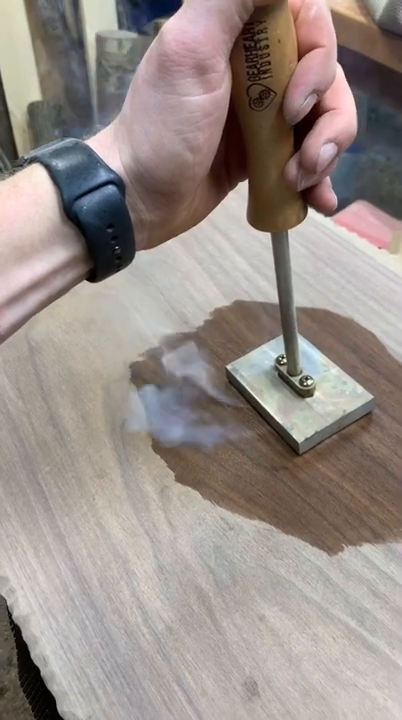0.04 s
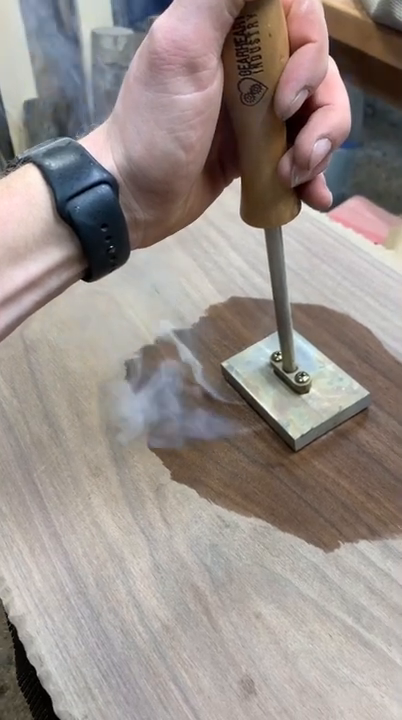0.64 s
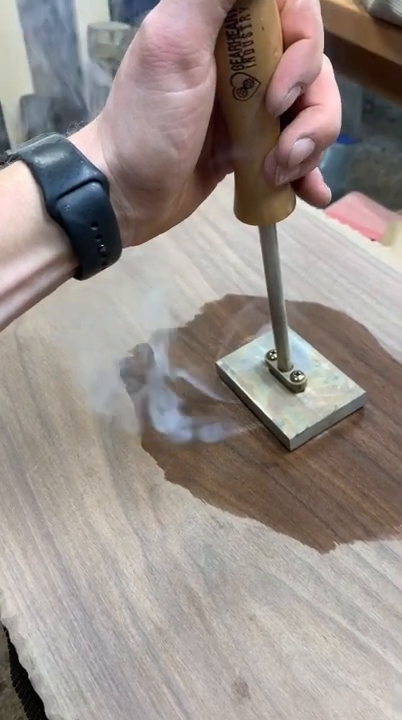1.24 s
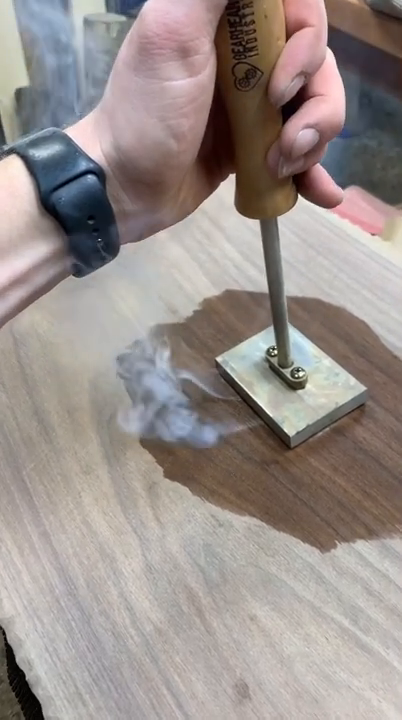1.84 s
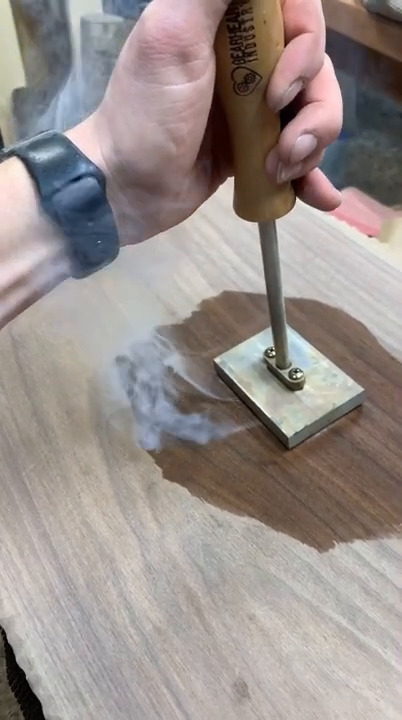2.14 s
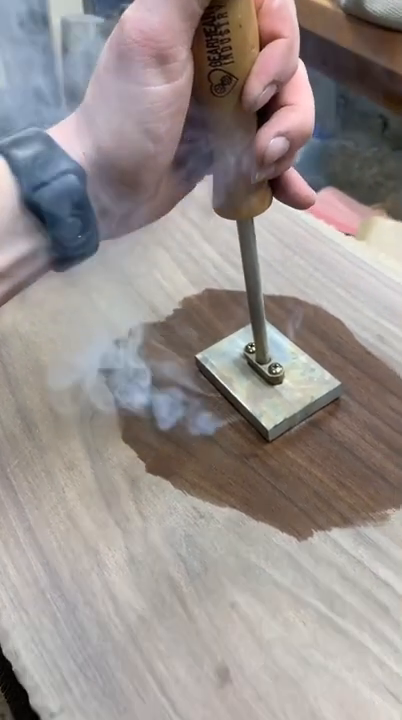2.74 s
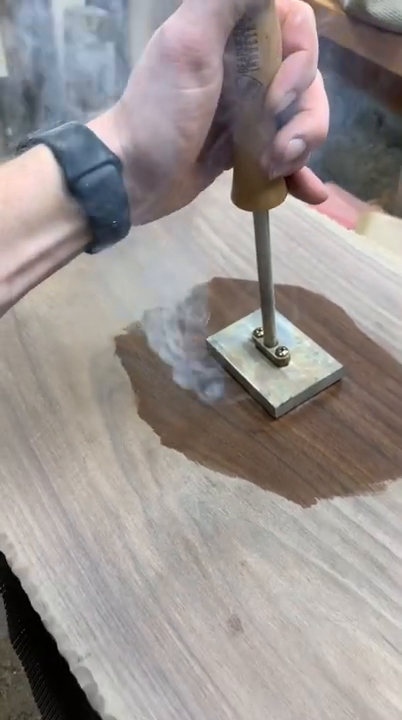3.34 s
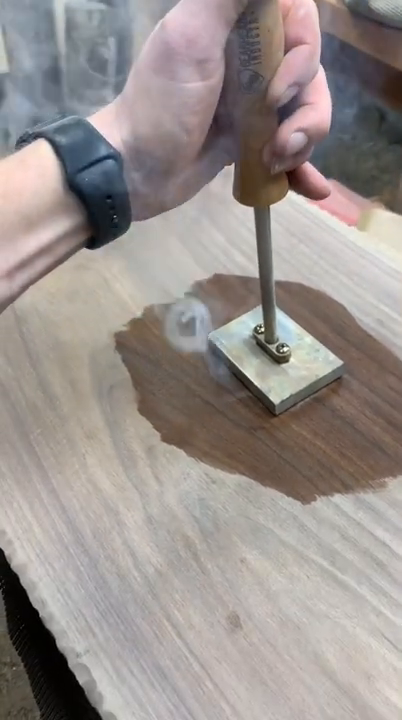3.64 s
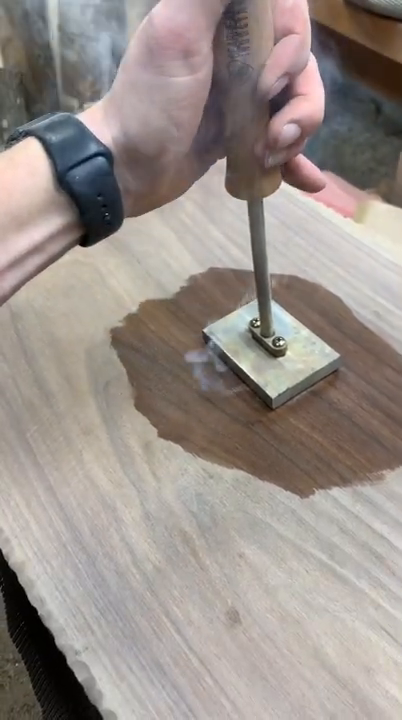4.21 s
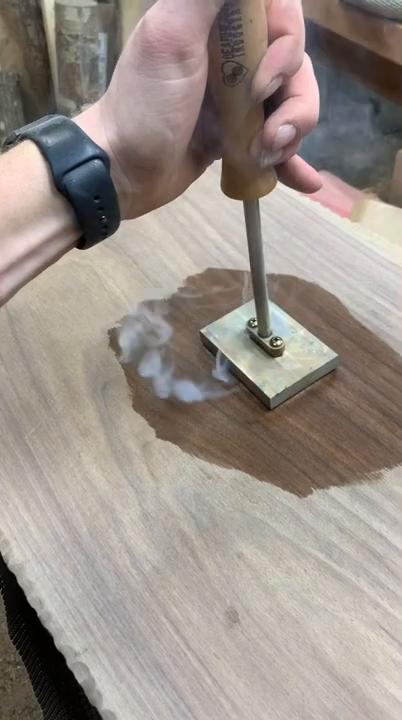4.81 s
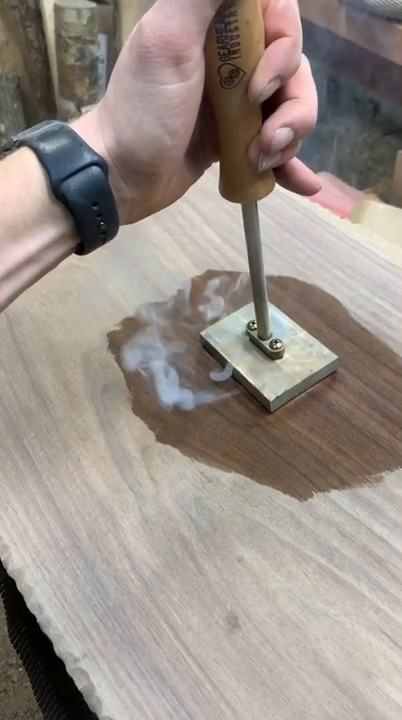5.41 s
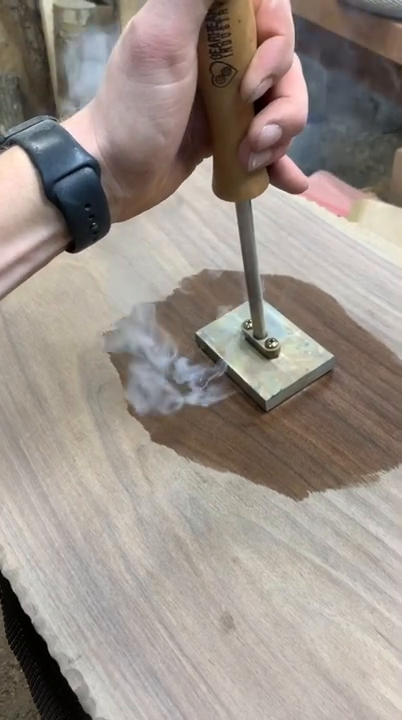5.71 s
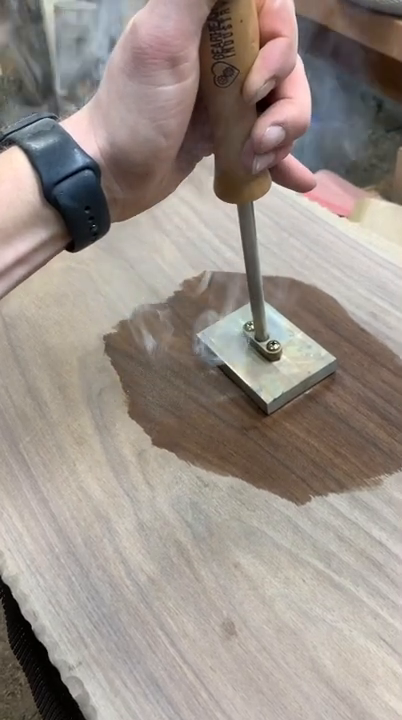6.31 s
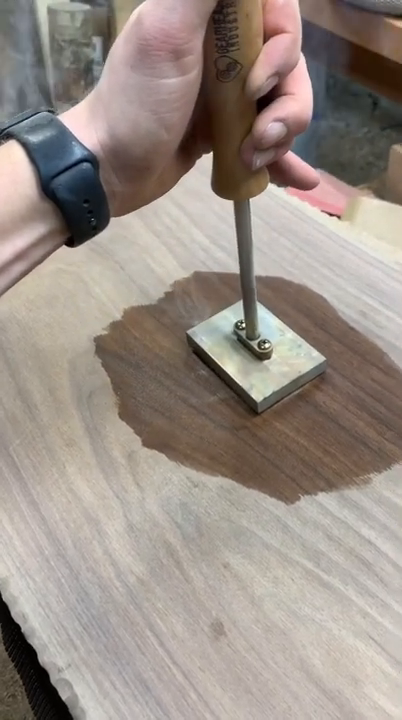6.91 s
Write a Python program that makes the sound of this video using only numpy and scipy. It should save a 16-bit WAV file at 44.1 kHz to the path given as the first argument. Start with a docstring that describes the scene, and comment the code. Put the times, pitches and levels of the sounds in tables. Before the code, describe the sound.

Steam sizzles from under a hot iron pressed on a wet board, fades, then returns after light metal clicks, a workshop fan droning behind.

```python
"""Steam hisses from under a hot branding iron pressed on a damp wooden board in a workshop.
Water boils in long surges: turbulent steam and bursting bubbles excite the resonances of the gap,
which shift as the iron settles and again when it is rocked. Drops spit and the wood simmers.
Slips of the iron set the metal ticking, and the board knocks under the shifting weight.
A fan and a mains hum drone behind, dipping once for an instant."""
import sys
import numpy as np
from scipy import signal
from scipy.fft import rfft, irfft
from scipy.io import wavfile
from scipy.ndimage import uniform_filter1d, map_coordinates

SR = 44100
rng = np.random.default_rng(int(sys.argv[2]) if len(sys.argv) > 2 else 0)


def unload_audio(sound):
    """Save the sound as a 16-bit wav file, at the path given as the first command line argument."""
    columns = np.transpose(np.atleast_2d(sound))
    # keep every value between -1 and 1, then stretch to whole-number steps
    steps = np.round(np.clip(columns, -1, 1) * 32767)
    wavfile.write(sys.argv[1], SR, steps.astype(np.int16))


N = 306936
TIME = np.arange(N) / SR
FREQ = np.maximum(np.arange(N // 2 + 1) * SR / N, 1)

# left-right coherence of room sound and of sound near the iron: (frequency [Hz], coherence [0-1])
ROOM_COHERENCE = [(30, 0.77), (280, 0.97), (650, 0.69), (1100, 0), (1500, 0.2), (2000, 0.68), (2600, 0.93),
                  (4000, 0.21), (6800, 1), (11000, 0.98), (15000, 1)]
NEAR_COHERENCE = [(3000, 0.8), (6000, 0.97), (7000, 1), (8300, 0.41), (9600, 1), (11000, 0.97),
                  (12400, 0.9), (13700, 0.99), (15000, 0.99)]
# resonances of the steam gap under the rocked iron: (frequency [Hz], width [Hz], gain [dB])
ROCKED_GAP = [(4460, 600, -21.5), (6190, 610, -14), (6930, 470, -13), (7350, 390, -11), (8340, 630, -8),
              (8700, 830, -18), (10900, 250, 6.5), (10830, 720, 0), (11840, 900, -4), (13000, 570, -3),
              (14350, 330, -1), (15500, 330, -10)]


def undb(db):
    """Decibels to amplitude ratio."""
    return 10 ** (np.asarray(db) / 20)


def across(rows):
    """Interpolation of (frequency [Hz], value) rows on a logarithmic frequency axis."""
    hz, value = np.transpose(rows)
    return np.interp(np.log(FREQ), np.log(hz), value)


def resonances(rows):
    """Incoherent summation: the gain of steep resonances whose powers add."""
    powers = (undb(db) ** 2 / (1 + 2 * ((FREQ - hz) / width) ** 2) ** 2 for hz, width, db in rows)
    return np.sqrt(sum(powers))


def colour(x, gain):
    """Linear filtering: each frequency is multiplied by its gain."""
    return irfft(rfft(x) * gain, N)


def unit(pair):
    """Normalisation of a stereo pair so that the mean of its sides has rms 1."""
    return pair / np.std(pair.mean(axis=0))


def walk(rate):
    """Random modulation of unit spread: levels held for 1 / rate seconds and smoothed twice."""
    hold = max(int(SR / rate), 2)
    steps = np.repeat(rng.standard_normal(N // hold + 1), hold)
    smooth = uniform_filter1d(uniform_filter1d(steps, hold), hold)[:N]
    return smooth / smooth.std()


def place(events):
    """Superposition of (time [s], sound) events."""
    out = np.zeros(N)
    for s, sound in events:
        start = int(s * SR)
        out[start:start + len(sound)] += sound[:N - start]
    return out


def stereo(common, apart, coherence, phase=None):
    """Partial coherence: one signal is shared, one has opposite signs, and the sides differ in phase."""
    # usual phase between the sides: (frequency [Hz], lead of the left [rad])
    usual_phase = [(20, 0), (620, 0), (860, -1.3), (1640, .6), (2400, 3.0), (5400, 3.25), (6200, 6.25),
                   (7490, 6.3), (9080, 9.35), (10200, 9.5), (11800, 12.55), (13000, 12.6), (14500, 15.7)]
    lead = across(usual_phase if phase is None else phase)
    alike = np.clip(across(coherence), 0, 1)
    sign = np.array([[1], [-1]])
    pair = rfft(common) * np.sqrt((1 + alike) / 2) + sign * rfft(apart) * np.sqrt((1 - alike) / 2)
    return irfft(pair * np.exp(.5j * sign * lead), N)


def scatter(x, t60):
    """Diffuse reflection: convolution with an exponentially fading noise tail of unit energy."""
    t = TIME[:SR // 4]
    tail = rng.standard_normal(len(t)) * undb(-60 * t / t60)
    return signal.fftconvolve(x, tail / np.linalg.norm(tail))[:N]


def ring(modes, tilt_db_per_octave=0, stretch=1, vary_db=1.5):
    """Free vibration: a sum of damped modes, weighted a little differently by each point of contact."""
    t = TIME[:SR // 4]
    top_db = max(db + tilt_db_per_octave * np.log2(hz) for hz, db, _ in modes)
    out = 0
    for hz, db, t60 in modes:
        start_db = db + vary_db * rng.uniform(-1, 1) + tilt_db_per_octave * np.log2(hz) - top_db
        out += undb(start_db - 60 * t / (t60 * stretch)) * np.sin(2 * np.pi * (hz * t + rng.random()))
    return out


def dip(at_s=2.727, depth_db=-17, fall_s=0.011, recover_s=0.018):
    """Amplitude envelope of the drone: the level dips briefly and recovers."""
    after = TIME - at_s
    return undb(depth_db * np.exp(-np.maximum(-after / fall_s, after / recover_s)))


def fan(air_db=-51, housing_db=-52):
    """Broadband and tonal fan noise: turbulent air, a resonant housing, mains hum and motor whine."""
    # spectrum of the rushing air: (frequency [Hz], relative spectral density [dB])
    air_spectrum = [(25, -18.5), (45, -7), (72, 3), (100, -2.5), (155, -7.5), (260, -2), (370, -13.5),
                    (600, -12), (760, -16.5), (1200, -23), (2200, -27), (3400, -37.5), (7500, -45.5),
                    (15000, -45)]
    # resonances of the housing: (frequency [Hz], width [Hz], gain [dB])
    housing_modes = [(121.5, 6, -7), (194.7, 16, -7), (237, 18.2, 0.5), (255.2, 10.8, -0.5),
                     (272.8, 16, -0.5), (318.8, 21, -7.5), (416, 27.3, -9), (468.3, 24, -9), (548, 17, -11),
                     (637.7, 24, -8), (1226, 26.6, -17), (1418, 9.4, -17.5)]
    # mains hum and motor whine: (frequency [Hz], level [dB], wobble [dB])
    motor_tones = [(120, -55.8, 2.2), (835.6, -59.8, .5)]
    air, housing = (stereo(*rng.standard_normal((2, N)), ROOM_COHERENCE) for _ in range(2))
    air = undb(air_db + 0.5 * walk(6.6)) * unit(colour(air, undb(across(air_spectrum))))
    housing = undb(housing_db) * unit(colour(housing, resonances(housing_modes)))
    hum = 0
    for hz, db, wobble_db in motor_tones:
        amplitude = np.sqrt(2) * undb(db + wobble_db * walk(8.5))
        hum += amplitude * np.sin(2 * np.pi * hz * TIME + 0.16 * walk(3.2))
    return (air + housing + stereo(hum, np.zeros(N), ROOM_COHERENCE)) * dip()


def board_knocks():
    """Impulse response: the shifting weight jolts the board's modes, and bench reflections smear them."""
    # jolts of the board: (time [s], level [dB])
    jolts = [(4.221, -50), (4.239, -42.5), (4.278, -49), (4.344, -48), (4.401, -51)]
    # modes of the board: (frequency [Hz], relative level [dB], t60 [s])
    board_modes = [(468, -11, 0.046), (595, -3, 0.051), (630, -5, 0.073), (700, -7, 0.028),
                   (1490, -12, 0.035), (2090, -11, 0.05)]
    knocks = place((s, undb(db) * ring(board_modes)) for s, db in jolts)
    return stereo(scatter(knocks, t60=0.12), np.zeros(N), ROOM_COHERENCE)


def iron_ticks(linger_db=-27, room_db=-20):
    """Stick-slip excitation: each slip snaps, cracks, rasps the wood fibres and rings the metal."""
    # slips of the iron: (time [s], level [dB], brightness [dB/octave], relative grit [dB])
    slips = [(0.0973, -53, -6, 0), (0.631, -57, -5, 5), (0.7999, -53.5, -7.5, -2), (1.03, -55, -6, 4),
             (2.7322, -64, -5, 0), (4.1428, -33, -1.5, 0), (4.1946, -33.5, -2, 0), (4.2390, -35.5, 0, 1.5),
             (4.2607, -40.5, -2.5, 0), (4.3440, -43, -1, 1), (4.8815, -36, -1.5, 3)]
    # modes of the plate and its stem: (frequency [Hz], relative level [dB], t60 [s])
    iron_modes = [(1480, -18, .018), (2126, -18, .02), (2990, -9, .026), (3420, -15, .012),
                  (4010, -10, .024), (4310, -7, .016), (5990, -9, .011), (6621, 0, .022), (7100, -7, .009),
                  (8274, -7, .014), (8950, -7.5, .028), (9600, -5, .008), (10220, 0, .012),
                  (11900, -11, .011), (13700, -18, .016)]
    # phase of the ringing plate between the sides: (frequency [Hz], lead of the left [rad])
    iron_phase = [(1800, 0), (2400, 2.8), (2750, 0), (3100, 0), (3600, 1.8), (4400, 2), (5000, 3.2),
                  (6100, 5.7), (6700, 5.6), (7200, 6.5), (9000, 8.6), (10200, 9.8), (11700, 12),
                  (13000, 13), (14700, 15.7)]
    t = TIME[:SR // 4]

    def burst(band_hz, db, t60, lag_s=0):
        """Band-limited noise with exponential decay."""
        band = signal.butter(3, band_hz, "band", fs=SR, output="sos")
        envelope = (t >= lag_s) * undb(db - 60 * (t - lag_s) / t60)
        return signal.sosfilt(band, rng.standard_normal(len(t)) * envelope)

    def tick(brightness, grit_db):
        """Modal ringing plus contact noise; a duller slip also has a weaker snap and crack."""
        metal = ring(iron_modes, brightness) + undb(linger_db) * ring(iron_modes, brightness, stretch=4)
        snap = burst((1200, 15500), db=-1, t60=.004)
        crack = burst((5500, 10500), db=1, t60=.012)
        rasp = burst((1800, 5600), db=0, t60=.021, lag_s=.001)
        return metal + undb(grit_db) * (undb(brightness) * (snap + crack) + rasp)

    direct = place((s, undb(db) * tick(brightness, grit_db)) for s, db, brightness, grit_db in slips)
    in_room = direct + undb(room_db) * scatter(direct, t60=.2)
    return stereo(in_room, scatter(direct, t60=.005), NEAR_COHERENCE, iron_phase)


def spitting_drops(t60=0.0055, gap_db=-2, snap_hz=5500):
    """Flash evaporation: single drops excite the gap, and part of their high snap radiates directly."""
    # drops at the edge of the plate: (time [s], level [dB], relative level of the direct snap [dB])
    drops = [(1.8605, -32, -22), (1.8995, -34, -22), (2.0688, -31, -22), (5.5385, -30, -20),
             (5.5820, -35, -11), (5.5885, -36, -7), (5.6020, -44, -18)]
    t = TIME[:SR // 50]
    flashes = [(s, rng.standard_normal(len(t)) * undb(db - 60 * t / t60), snap_db)
               for s, db, snap_db in drops]
    spits = place((s, flash) for s, flash, _ in flashes)
    snaps = place((s, undb(snap_db) * flash) for s, flash, snap_db in flashes)
    in_gap = colour(stereo(spits, scatter(spits, t60=.005), NEAR_COHERENCE), resonances(ROCKED_GAP))
    highpass = signal.butter(4, snap_hz, "high", fs=SR, output="sos")
    return undb(gap_db) * in_gap + signal.sosfilt(highpass, snaps)


def steam_flow(build_power=0.97, die_power=1.6):
    """Power addition of boiling surges: gives their joint flow (a gain) and the share due to bubbles."""
    # surges: (start [s], build-up [s], hold [s], die-away [s], level [dB], bubble share [0-1])
    surges = [(-.4, 0.26, 0.95, 0.76, -40.5, 0.1), (0.978, 0.62, 0.65, 0.41, -41, 0.33),
              (2.487, 0.32, 0.1, 0.21, -63, 0.8), (4.188, 0.47, 0.26, 0.88, -48, 0.8),
              (4.7, 0.404, 0.438, 0.075, -41, 0.24), (5.168, 0.11, 0.035, 0.062, -43.5, 0.3),
              (6.738, 0.057, 0.053, 0.089, -64, 0.5)]
    power, bubble_power = 1e-18, 0
    for start, build, hold, die, db, share in surges:
        rise = np.clip((TIME - start) / build, 0, 1) ** build_power
        fall = np.clip(1 - (TIME - start - build - hold) / die, 0, 1) ** die_power
        surge = (undb(db) * rise * fall) ** 2
        power += surge
        bubble_power += share * surge
    return np.sqrt(power), np.clip(bubble_power / power, 0, 1)


def simmer(flow, rest_db=-79, hot_db=-72, cool_s=0.36, dry_from_s=6.47, drying_s=0.22):
    """Thermal lag: damp wood stores the heat of the surges and seethes between them until it is dry."""
    retained = np.exp(-1 / (cool_s * SR))
    heat = signal.lfilter([1 - retained], [1, -retained], flow / flow.max())
    moisture = np.clip(1 - (TIME - dry_from_s) / drying_s, 0, 1)
    noise = stereo(*rng.standard_normal((2, N)), NEAR_COHERENCE)
    seething = unit(colour(noise, resonances([(7000, 2200, 0)])))
    return seething * moisture * np.hypot(undb(rest_db), undb(hot_db) * heat) * undb(1.3 * walk(12))


def bubble_bursts(per_s, spread_db):
    """Shot noise of rms 1: bubbles burst at random moments, most small and a few large."""
    sizes = undb(spread_db * np.minimum(rng.exponential(size=N), 4))
    impulses = (rng.random(N) < per_s / SR) * sizes * rng.choice([-1, 1], N)
    return impulses / impulses.std()


def rim_crackle(flow, per_s=140, spread_db=3, full_flow_db=-72):
    """Bubble resonance: bigger bubbles at the rim crackle below the hiss, in proportion to the flow."""
    # pitches of the rim bubbles: (frequency [Hz], width [Hz], gain [dB])
    rim_bands = [(3150, 300, -6), (3900, 450, -3), (4600, 500, 0), (5250, 400, 2)]
    bubbles = stereo(bubble_bursts(per_s, spread_db), bubble_bursts(per_s, spread_db), NEAR_COHERENCE)
    return unit(colour(bubbles, resonances(rim_bands))) * flow / flow.max() * undb(full_flow_db)


def blowing(flow, full_flow_db=-69.5, flow_power=0.51, gurgle_db=1.2):
    """Jet noise: steam leaves the edge in soft, uneven spurts that grow as a power of the flow."""
    # broad peaks of the jet: (frequency [Hz], width [Hz], gain [dB])
    jet_bands = [(1340, 940, 5), (3650, 1800, -9)]
    noise = stereo(*rng.standard_normal((2, N)), ROOM_COHERENCE)
    jet = unit(colour(noise, resonances(jet_bands)))
    return jet * (flow / flow.max()) ** flow_power * undb(full_flow_db + gurgle_db * walk(16))


def boiling(bubble_share, pops_per_s=40, pop_db=10, pop_spread_db=2.5):
    """Broadband excitation: turbulent steam and bubbles share the power, with sharper pops on top."""
    popping = rng.random(N) < pops_per_s / SR
    pops = popping * undb(pop_db + pop_spread_db * np.minimum(rng.exponential(size=N), 2.5))
    bubbles = np.sqrt(bubble_share) * bubble_bursts(per_s=2100, spread_db=2.0)
    steam = np.sqrt(1 - bubble_share) * rng.standard_normal(N)
    return bubbles + steam + pops


def steam_hiss(flow, bubble_share, settle_s=0.96, settling_s=0.63, rocked_s=4.2,
               pitch_drift=.004, treble_hz=9060, treble_power=0.33, sputter_db=0.6, bench_db=-24):
    """Cavity resonance: the gap filters the boiling, and its peaks shift as the iron settles or rocks."""
    # resonances of the gap at first and once settled: (frequency [Hz], width [Hz], gain [dB])
    first_gap = [(5160, 1500, -17), (5800, 310, -13), (7080, 610, -7), (8080, 380, -10), (8730, 470, -6.5),
                 (10550, 510, 2.5), (11300, 750, -3), (12000, 400, 0), (12700, 500, -1), (12900, 180, -5),
                 (14040, 330, 1)]
    settled_gap = [(5220, 1260, -17.5), (5830, 300, -15.5), (6790, 300, -8.5), (7200, 450, -7),
                   (8090, 380, -5.5), (8730, 240, -7), (10650, 390, 2), (11430, 1000, -3.5),
                   (12140, 275, 3), (12700, 480, -6), (13300, 600, -4.5), (14050, 370, -0.5)]
    # uneven escape of the steam: (rate [1/s], spread [dB])
    puffs = [(450, 1.0), (90, .55), (14, .5)]
    source = stereo(boiling(bubble_share), boiling(bubble_share), NEAR_COHERENCE)
    first, settled, rocked = (unit(colour(source, resonances(gap)))
                              for gap in (first_gap, settled_gap, ROCKED_GAP))
    sunk = np.clip((TIME - settle_s) / settling_s, 0, 1)
    shaped = np.where(TIME < rocked_s, first + sunk * (settled - first), rocked)
    # the pitch drifts as the hand sways
    positions = np.arange(N) + np.cumsum(pitch_drift * walk(2.5))
    swayed = np.array([map_coordinates(side, [positions], order=3, mode="mirror") for side in shaped])
    treble = colour(swayed, FREQ > treble_hz)
    body = (swayed - treble) * undb(sputter_db * walk(45))
    brightness = (flow / flow.max()) ** treble_power  # weak steam is duller
    puffing = undb(sum(db * walk(rate) for rate, db in puffs))
    hiss = (body + treble * brightness) * flow * puffing
    return hiss + undb(bench_db) * np.array([scatter(side, t60=0.15) for side in hiss])


def scene():
    """Superposition: four sounds driven by one steam flow, the ticks, knocks and spits, and the fan."""
    flow, bubble_share = steam_flow()
    steam = steam_hiss(flow, bubble_share) + blowing(flow) + rim_crackle(flow) + simmer(flow)
    return steam + iron_ticks() + board_knocks() + spitting_drops() + fan()


def record(dry):
    """Band limiting: a steep elliptic low-pass removes the highest treble."""
    return signal.sosfilt(signal.ellip(12, .2, 80, 15650, fs=SR, output="sos"), dry)


dry = scene()
out = record(dry)
unload_audio(out)
```